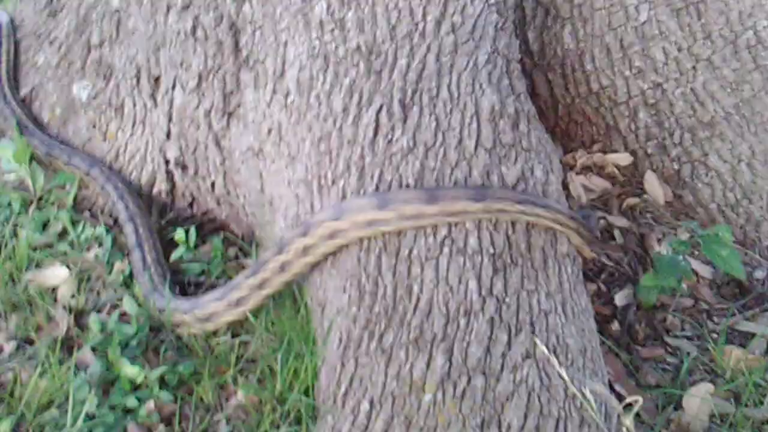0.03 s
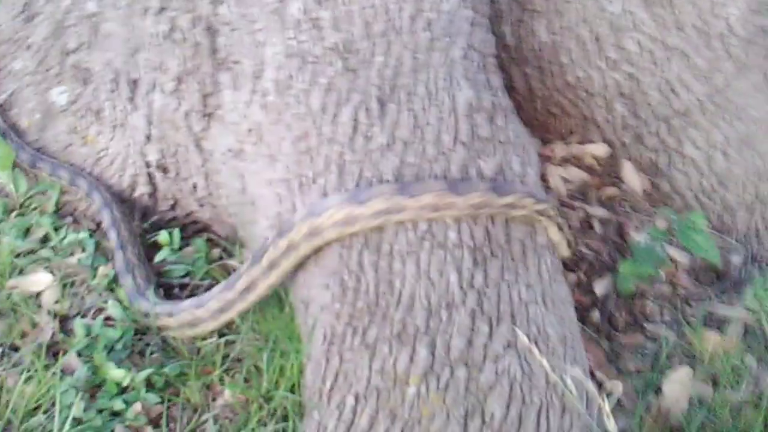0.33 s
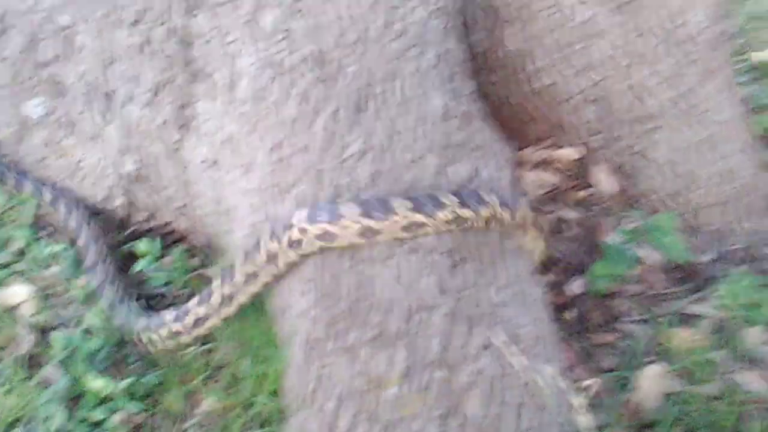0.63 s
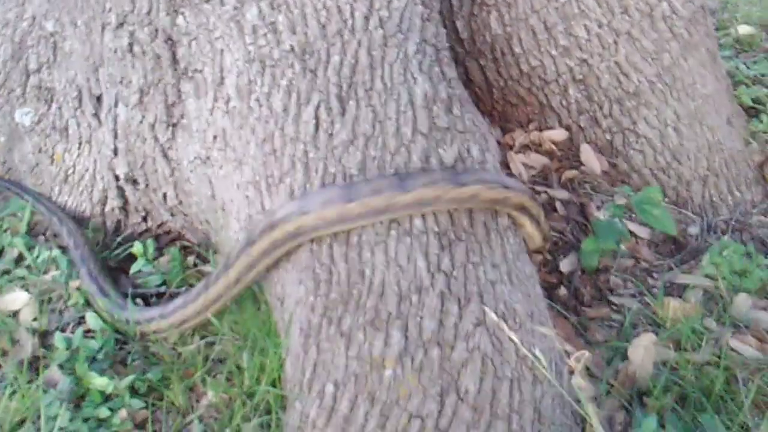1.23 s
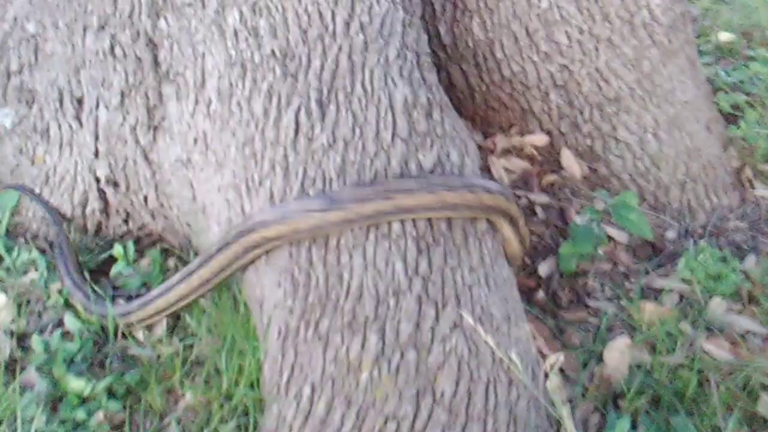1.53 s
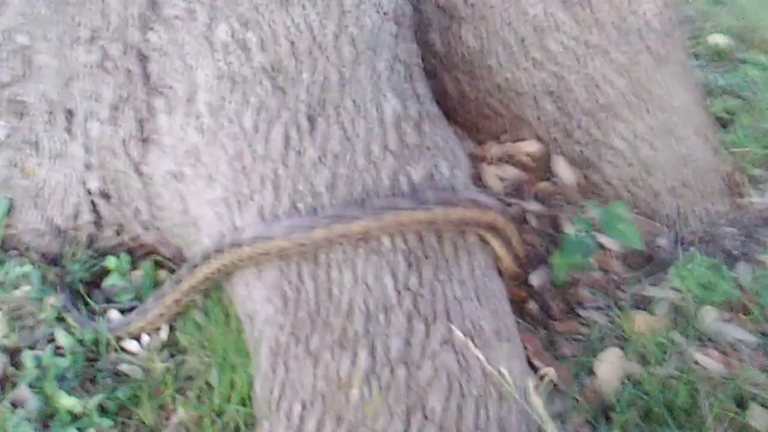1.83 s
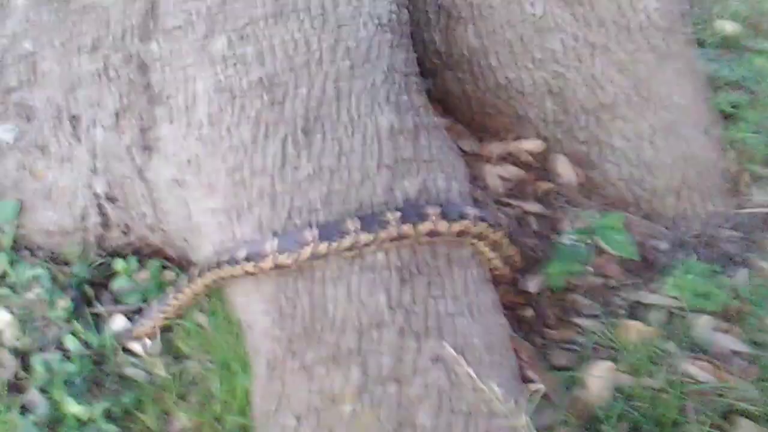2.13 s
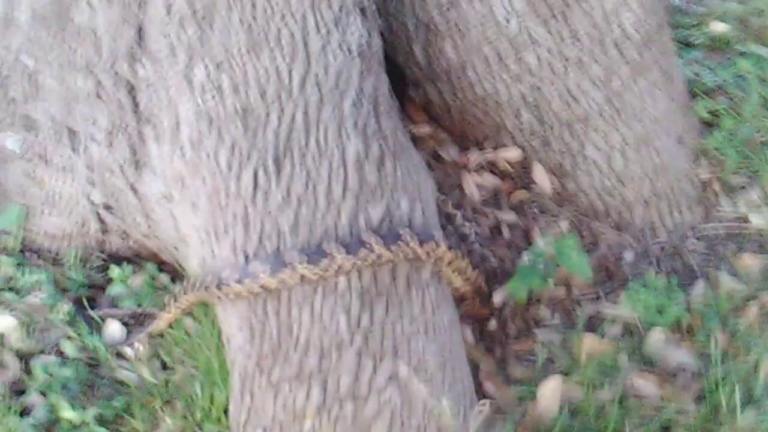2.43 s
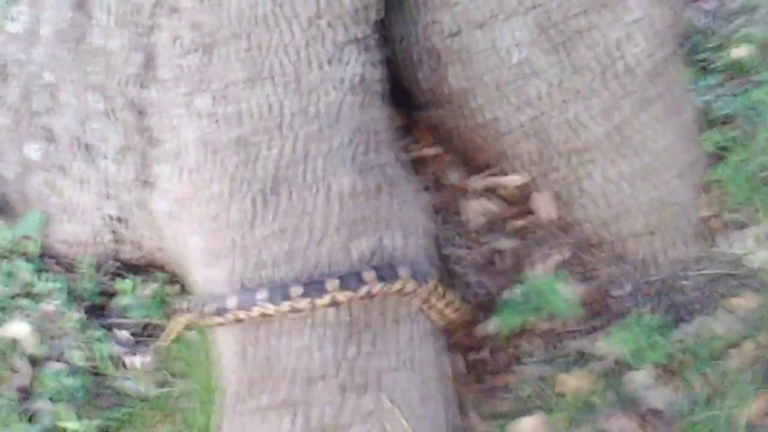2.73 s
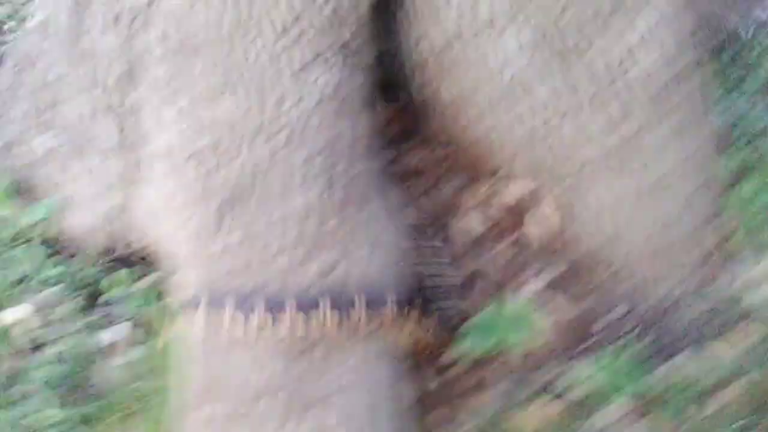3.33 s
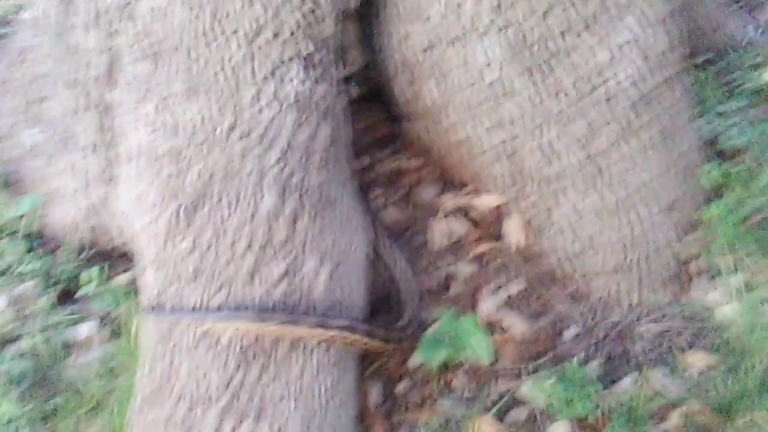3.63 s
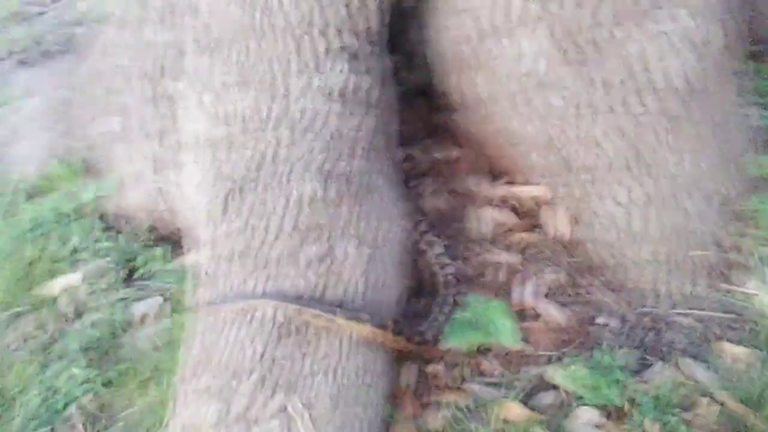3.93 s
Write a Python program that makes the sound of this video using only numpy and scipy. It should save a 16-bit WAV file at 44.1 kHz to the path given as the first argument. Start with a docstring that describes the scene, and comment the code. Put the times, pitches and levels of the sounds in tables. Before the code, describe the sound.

A snake rustles through dry leaves outdoors, mostly on the right, starting at about 1.6 seconds. Short, high hissing brushes and crisp snaps cluster from 2 to 2.6 seconds, with stronger brushes near 3.3 and 3.8. Low wind buffets the microphone's left side throughout, light at first, then thumping louder than the leaves, strongest around 3 to 3.6 seconds. Distant traffic hums faintly underneath.

```python
"""A rising breeze buffets the left microphone port with low, lumpy eddies; behind it, distant traffic
hums and its tyres hiss. Now and then a puff of wind catches the right port.
There a snake slides over a tree root into dry leaves: its body rubs out short brushes of friction
hiss, leaf edges slip and crackle, and single leaves snap."""
import sys
import numpy as np
from scipy import signal
from scipy.fft import rfft, irfft
from scipy.io import wavfile
from scipy.ndimage import uniform_filter1d, map_coordinates

SR = 44100
rng = np.random.default_rng(int(sys.argv[2]) if len(sys.argv) > 2 else 0)


def wav_out(sig):
    """Save sig, one row per channel (or a flat mono array), as 16-bit PCM at SR to the path in sys.argv[1]."""
    wavfile.write(sys.argv[1], SR, np.round(np.clip(np.atleast_2d(sig).T, -1, 1) * 32767).astype(np.int16))


N = 176400
TIME_S = np.arange(N) / SR
BINS_HZ = np.maximum(np.arange(N // 2 + 1) * SR / N, 1)


def from_db(db):
    """Decibels to gain."""
    return 10 ** (np.asarray(db) / 20)


def unit_rms(x):
    """Scale to unit power."""
    return x / np.sqrt(np.mean(x ** 2) + 1e-20)


def at_hz(spectrum, hz, column=1):
    """Read a table column along log frequency."""
    table = np.array(spectrum)
    return np.interp(np.log(hz), np.log(table[:, 0]), table[:, column])


def colour(x, spectrum):
    """Filter by a spectrum, at unit power."""
    return unit_rms(irfft(rfft(x) * from_db(at_hz(spectrum, BINS_HZ)), N))


def drift(rate_hz):
    """Slow random wander, at unit power."""
    return unit_rms(irfft(rfft(rng.standard_normal(N)) / (1 + (BINS_HZ / rate_hz) ** 2), N))


def bell(peak_s, sigma_s):
    """Gaussian gain, 1 at its peak."""
    return np.exp(-0.5 * np.minimum(((TIME_S - peak_s) / sigma_s) ** 2, 100))


def stroke(peak_s, rise_s, fall_s):
    """Pointed gain, 1 at its peak; rise and fall each span 20 dB."""
    gain = np.zeros(N)
    span = slice(*np.searchsorted(TIME_S, [peak_s - 3 * rise_s, peak_s + 3 * fall_s]))
    distance = np.maximum((peak_s - TIME_S[span]) / rise_s, (TIME_S[span] - peak_s) / fall_s)
    gain[span] = from_db(-20 * distance ** 1.12)
    return gain


# large eddies, one list per gust: time_s, level_db
GUSTS = [
    [(0.054, -60), (0.078, -43), (0.154, -52), (0.192, -47), (0.224, -80), (0.254, -37), (0.308, -49.5),
     (0.452, -45), (0.504, -78), (0.526, -39), (0.564, -51), (0.59, -46.5), (0.69, -62)],
    [(0.736, -57.5), (0.844, -65), (0.864, -49.5), (0.954, -44.5), (0.976, -52), (1.034, -50.5),
     (1.058, -61.5), (1.148, -64), (1.19, -51)],
    [(1.248, -53), (1.266, -42.5), (1.384, -54.5), (1.438, -47.5), (1.552, -43.5), (1.57, -55),
     (1.604, -35), (1.642, -45), (1.676, -33), (1.732, -55), (1.788, -32.5), (1.844, -57), (1.9, -44),
     (1.96, -50)],
    [(2.0, -72), (2.016, -45), (2.12, -32), (2.188, -47), (2.222, -33), (2.25, -45), (2.284, -31),
     (2.346, -47), (2.404, -29), (2.48, -44.5), (2.5, -24.5), (2.514, -29), (2.532, -25.5), (2.6, -50),
     (2.692, -37.5), (2.72, -55)],
    [(2.73, -38.5), (2.786, -32.5), (2.854, -29), (2.962, -26.5), (3.002, -18), (3.066, -30),
     (3.104, -21.5), (3.288, -42), (3.31, -28.5), (3.356, -26.5), (3.384, -46.5), (3.41, -43)],
    [(3.426, -56), (3.44, -24), (3.486, -20.5), (3.542, -21), (3.618, -34), (3.65, -29.5), (3.686, -43.5),
     (3.706, -42), (3.762, -34.5), (3.794, -42), (3.85, -42), (3.884, -30), (3.916, -30), (3.97, -39),
     (3.99, -29.5)],
]
# small eddies against large: time_s, offset_db
SMALL_EDDIES = [(.42, -34), (.53, -16.5), (.6, -27), (.86, -23), (1.45, -29), (1.8, -20), (2.45, -18.5),
                (2.77, -16), (3.08, -26.5), (3.37, -18.5), (3.45, -21), (3.72, -19.5), (3.84, -6.5),
                (3.96, -33.5)]
# eddy spectrum: freq_hz, gain_db, small_eddy_share
EDDY_SPECTRUM = [(35, -21.5, 0), (68.5, 1, 0.01), (130, -1.5, 0.23), (282, -1, 0.57), (393, 0, 0.79),
                 (618, -6.5, 0.96), (1130, -17.5, 1.5), (2200, -30, 0.76), (4500, -26, 1)]
# the sharpest gust is too fast to form the deepest eddies: time_s, low_edge_hz
LOW_EDGE = [(3.4, 35), (3.45, 122), (3.59, 122.8), (3.64, 35)]
EDGE_HZ, EDGE_AT_DB, WIND_DB_PER_EDGE_OCTAVE = 843, -38.5, 18.5
HIGH_LOSS_DB_PER_OCTAVE, HIGH_LOSS_MAX_DB, LOW_LOSS_DB_PER_OCTAVE = 41, 17, 10.5
EDDIES_PER_CYCLE, TURBULENCE_DB, LEVELLING_S = 1.4, 5, 0.0391
PORT_LOW_CUT_HZ, WIND_GAIN_DB = 28, 3


def breeze():
    """Eddies of all sizes pass the left port; stronger wind breaks them up finer."""
    rate_hz, t = SR / 4, TIME_S[::4]
    turbulence_db = TURBULENCE_DB * drift(rate_hz=68)[::4]
    large_db = np.interp(t, *np.concatenate(GUSTS).T)
    small_db = large_db + np.interp(t, *np.transpose(SMALL_EDDIES)) + turbulence_db
    high_edge_hz = EDGE_HZ * 2 ** ((small_db - EDGE_AT_DB) / WIND_DB_PER_EDGE_OCTAVE)
    low_edge_hz = np.interp(t, *np.transpose(LOW_EDGE))
    flow = np.zeros(len(t))
    for hz in 35 * 2 ** (np.arange(14) / 2):
        kicks = (rng.random(len(t)) < EDDIES_PER_CYCLE * hz / rate_hz) * rng.choice([-1, 1], len(t))
        band = signal.butter(2, [hz / 1.3, hz * 1.3], "band", fs=rate_hz, output="sos")
        swirl = unit_rms(signal.sosfilt(np.vstack([band, band]), kicks + 1e-18))
        swirl /= np.sqrt(uniform_filter1d(swirl ** 2, int(LEVELLING_S * rate_hz)) + 0.11)
        share = np.clip(at_hz(EDDY_SPECTRUM, hz, column=2), 0, 1)
        level_db = at_hz(EDDY_SPECTRUM, hz) + (1 - share) * large_db + share * small_db
        high_loss_db = np.clip(HIGH_LOSS_DB_PER_OCTAVE * np.log2(hz / high_edge_hz), 0, HIGH_LOSS_MAX_DB)
        low_loss_db = LOW_LOSS_DB_PER_OCTAVE * np.clip(np.log2(low_edge_hz / hz), 0, 1)
        flow += swirl * from_db(level_db - high_loss_db - low_loss_db)
    low_cut = signal.butter(3, PORT_LOW_CUT_HZ, "high", fs=rate_hz, output="sos")
    flow = signal.sosfilt(low_cut, flow)
    return from_db(WIND_GAIN_DB) * signal.resample_poly(flow, 4, 1, window=("kaiser", 10))


# traffic hum: freq_hz, gain_db
HUM_SPECTRUM = [(30, -27), (55, 2), (135, 1), (220, -9.5), (290, -6), (350, -16), (750, -27.5),
                (8000, -100)]


def traffic_hum(level_db):
    """Steady low rumble of far traffic."""
    return from_db(level_db) * colour(rng.standard_normal(N), HUM_SPECTRUM)


# tyre hiss: freq_hz, gain_db
TYRE_SPECTRUM = [(600, -32), (722, -8.5), (1050, 0.5), (1590, -3.5), (3460, -22), (4940, -32),
                 (14000, -48.5)]
# swells of the hiss: peak_s, level_db, sigma_s, pitch_hz
TYRE_SWELLS = [(0.155, -56, 0.021, 1280), (0.76, -60.5, .05, 1950), (1.01, -53, .026, 1730),
               (1.115, -55, 0.034, 1640), (1.975, -56.5, 0.032, 1320), (2.091, -53.5, 0.028, 1570),
               (2.341, -55, 0.017, 1370)]
TYRE_DB, TYRE_FLICKER_DB, TYRE_LOW_CUT_HZ = -57.5, 0.62, 543


def tyre_hiss():
    """Far tyre noise with a few soft swells, each around its own pitch."""
    low_cut = signal.butter(2, TYRE_LOW_CUT_HZ, "high", fs=SR, output="sos")
    hiss = unit_rms(signal.sosfilt(low_cut, colour(rng.standard_normal(N), TYRE_SPECTRUM)))
    hiss *= from_db(TYRE_DB + TYRE_FLICKER_DB * drift(rate_hz=37))
    for peak_s, level_db, sigma_s, hz in TYRE_SWELLS:
        band = signal.butter(2, [hz / 1.13, hz * 1.13], "band", fs=SR, output="sos")
        swell = unit_rms(signal.sosfilt(band, rng.standard_normal(N)))
        hiss += from_db(level_db) * bell(peak_s, sigma_s) * swell
    return hiss


# single eddies at the left port: peak_s, peak_db, pitch_hz
THUMPS = [(0.588, -21.5, 86), (.948, -25.5, 128), (1.291, -25.5, 90), (1.606, -16, 93.5),
          (1.666, -23.5, 214), (2.119, -15, 127), (2.514, -12, 111), (2.783, -14.5, 180),
          (2.88, -14.5, 130), (2.950, -22.5, 480), (2.998, -10, 114), (3.108, -12, 108),
          (3.135, -15.5, 164), (3.442, -16, 356), (3.489, -9, 106), (3.544, -10.5, 186),
          (3.641, -16.5, 397)]


def with_thumps(flow):
    """A large eddy sweeps the others aside: one pressure bump between two dips."""
    for peak_s, peak_db, hz in THUMPS:
        phase_sq = np.minimum((np.pi * hz * (TIME_S - peak_s)) ** 2, 100)
        bump = (1 - 2 * phase_sq) * np.exp(-phase_sq)
        duck = 1 - 0.7 * np.exp(-phase_sq / 6)
        flow = duck * flow + from_db(peak_db) * bump
    return flow


# wind at the right port: peak_s, level_db, sigma_s
PUFFS = [(1.325, -30, 0.0084), (1.375, -30.5, 0.013), (2.38, -31.5, 0.03), (2.76, -35, 0.058),
         (3.6, -31, 0.025), (3.675, -32, 0.019)]
# puff spectrum: freq_hz, gain_db
PUFF_SPECTRUM = [(15, -22), (38, -17), (68, 0), (105, -9), (170, -16), (300, -36), (900, -60), (5000, -110)]


def puffs():
    """The breeze catches the right port in brief, low puffs."""
    power = sum((from_db(level_db) * bell(peak_s, sigma_s)) ** 2 for peak_s, level_db, sigma_s in PUFFS)
    return np.sqrt(power) * colour(rng.standard_normal(N), PUFF_SPECTRUM)


def leaf_friction(spectrum, patch_db=4, patch_hz=320, patch_s=0.016):
    """Friction hiss coloured by the shifting resonances of whichever leaves are touched."""
    hz, t, cells = signal.stft(rng.standard_normal(N), SR, nperseg=512)
    grid = np.meshgrid(hz / patch_hz, t / patch_s, indexing="ij")
    resonances = map_coordinates(rng.standard_normal((256, 512)), grid, order=1, mode="wrap")
    _, hiss = signal.istft(cells * from_db(patch_db * resonances), SR)
    return colour(hiss[:N], spectrum)


def leaf_tilt(x, db_per_octave):
    """Small stiff leaves lean towards the treble, large ones away from it."""
    octaves = np.log2(np.clip(BINS_HZ, 5000, 14000) / 8500)
    return irfft(rfft(x) * from_db(db_per_octave * octaves), N)


def leaf_crackle(spectrum, slips_per_s=650, spread_db=4, ring_cycles=9):
    """Tiny slips of leaf edges, each ringing a few cycles at one of ten pitches."""
    sizes = from_db(spread_db * np.minimum(rng.exponential(1, N), 4)) * rng.choice([-1, 1], N)
    slips = sizes * (rng.random(N) < slips_per_s / SR)
    pitch_index = rng.integers(0, 10, N)
    rings = np.zeros(N)
    for k, hz in enumerate(np.geomspace(5500, 14000, 10)):
        radius, angle = from_db(-60 * hz / (ring_cycles * SR)), 2 * np.pi * hz / SR
        resonator = [np.sin(angle), 0, -np.sin(angle)], [1, -2 * radius * np.cos(angle), radius ** 2]
        rings += signal.lfilter(*resonator, slips * (pitch_index == k) + 1e-18)
    return colour(rings, spectrum)


# leaf hiss and crackle, turned down sharply below 5 kHz as by a noise suppressor: freq_hz, gain_db
LEAF_SPECTRUM = [(2500, -11.5), (4600, -14.5), (5300, 0), (6500, 2), (8500, 0), (14000, -2.5)]
# broad-leaf rasp: freq_hz, gain_db
RASP_SPECTRUM = [(700, -16), (2100, -10), (2900, -3.5), (4000, -3), (5500, -5.5), (8000, -35)]
# snake against leaves: peak_s, level_db, rise_s, fall_s, crackle_rel_db, rasp_rel_db, tilt_db_per_octave
BRUSHES = [(1.656, -54, 0.039, 0.14, -5.5, -19, 2), (1.965, -57, .027, 0.057, -5.5, -11, -4),
           (2.11, -55.5, 0.088, 0.11, 0.5, -18, -1.5), (2.26, -55, 0.098, 0.16, -3.5, -14.5, 4),
           (2.5, -62.5, 0.079, 0.078, -9, -9, -13), (2.554, -56, 0.038, 0.13, 0, -15, 0),
           (2.63, -48.5, 0.068, 0.072, -7, -16.5, -2), (2.845, -72.5, 0.054, 0.17, -7, -7, -1),
           (2.949, -61, 0.05, 0.096, -1, -11, 15), (3.135, -67.5, .16, 0.14, -9, -3, -11),
           (3.282, -42.5, 0.046, .061, -20, -11.5, 5.5), (3.332, -40, 0.034, 0.071, -8.5, -5, 5),
           (3.369, -46, 0.083, 0.11, -23, -11, -4), (3.569, -59.5, .028, 0.028, -24, -13, 10),
           (3.647, -53.5, 0.051, 0.087, -22, -17, 3), (3.78, -44, .05, 0.13, -12, -13, -1)]


def brushes():
    """Each push of the snake's body makes sliding hiss, crackle and the lower rasp of broad leaves."""
    slide = leaf_friction(LEAF_SPECTRUM)
    crackle = leaf_crackle(LEAF_SPECTRUM)
    rasp = leaf_friction(RASP_SPECTRUM)
    out = np.zeros(N)
    for peak_s, level_db, rise_s, fall_s, crackle_rel_db, rasp_rel_db, tilt in BRUSHES:
        push = from_db(level_db) * stroke(peak_s, rise_s, fall_s)
        out += leaf_tilt(push * (slide + from_db(crackle_rel_db) * crackle), tilt)
        out += push * from_db(rasp_rel_db) * rasp
        slide, crackle, rasp = np.roll([slide, crackle, rasp], N // 7, axis=1)  # decorrelate overlaps
    return out


# snapping leaves: start_s, level_db, tilt_db_per_octave
SNAPS = [(1.6474, -41.5, 2), (1.6718, -42, 1), (1.6896, -41, -1), (2.0822, -47, 14), (2.113, -50, -4),
         (2.1367, -43, -4), (2.147, -39, -1), (2.1659, -45, -4), (2.1847, -41, 1), (2.2027, -39, 0),
         (2.221, -46, 0), (2.23, -45, 9), (2.241, -49, 8), (2.262, -44.5, 10), (2.281, -49, 11),
         (2.32, -50.5, 15), (2.379, -51.5, 8), (2.482, -51.5, 11), (2.5322, -40, -6), (2.5505, -50, -11),
         (2.584, -47.5, -7), (3.113, -60.5, 37), (3.23, -49, 8), (3.277, -41, 14), (3.6243, -39, -1.5),
         (3.7698, -42, 7)]


def snaps(gain_db=1, rise_s=0.00093, fall_s=0.0064):
    """A dry leaf snaps in a burst of noise a few milliseconds long."""
    hiss = leaf_friction(LEAF_SPECTRUM)
    out = np.zeros(N)
    for start_s, level_db, tilt in SNAPS:
        burst = from_db(level_db + gain_db) * stroke(start_s + rise_s, rise_s, fall_s)
        out += leaf_tilt(burst * hiss, tilt)
    return out


# strokes of thin hiss: peak_s, level_db, rise_s, fall_s
TOP_STROKES = [(2.37, -61, .15, .19), (2.95, -52.5, 0.02, 0.16), (3.11, -58.5, 0.13, 0.47)]
# thin hiss: freq_hz, gain_db
TOP_SPECTRUM = [(9000, -24), (11500, -10), (12300, 0), (15000, 0)]


def top_hiss():
    """Thin leaf friction at the very top of the rustle."""
    gain = sum(from_db(level_db) * stroke(peak_s, rise_s, fall_s)
               for peak_s, level_db, rise_s, fall_s in TOP_STROKES)
    return gain * leaf_friction(TOP_SPECTRUM)


LEAVES_LEFT_DB, TYRES_LEFT_DB = -47, -27.5


def scene():
    """Wind fills the left port; leaves and traffic reach mainly the right one."""
    rustle = brushes() + snaps() + top_hiss()
    left = with_thumps(breeze()) + from_db(LEAVES_LEFT_DB) * rustle
    left += from_db(TYRES_LEFT_DB) * tyre_hiss() + traffic_hum(level_db=-78)
    right = rustle + tyre_hiss() + traffic_hum(level_db=-48) + puffs()
    return np.array([left, right])


SELF_NOISE_DB, HIGH_CUT_HZ = -80, 14400


def record(dry):
    """Faint self-noise, then a steep cut of the top."""
    noisy = dry + from_db(SELF_NOISE_DB) * rng.standard_normal((2, N))
    return signal.sosfilt(signal.ellip(10, 0.3, 80, HIGH_CUT_HZ, fs=SR, output="sos"), noisy)


dry = scene()
out = record(dry)
wav_out(out)
```